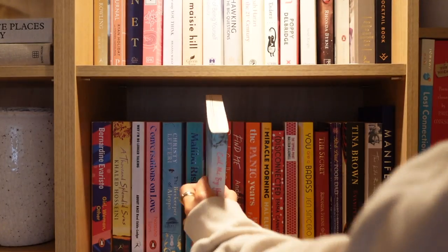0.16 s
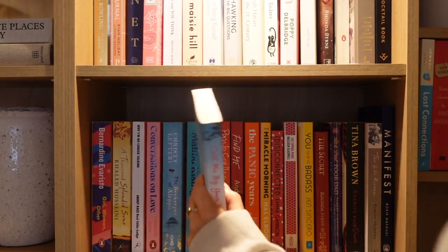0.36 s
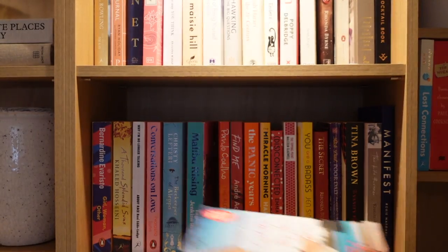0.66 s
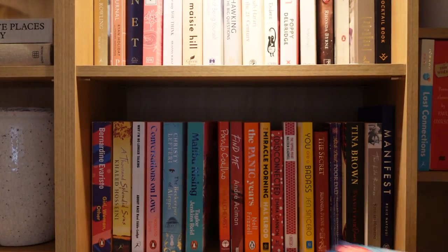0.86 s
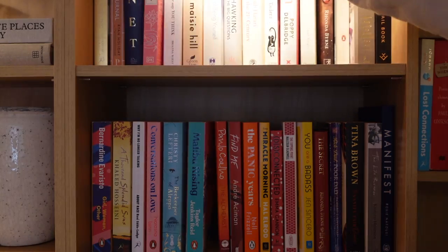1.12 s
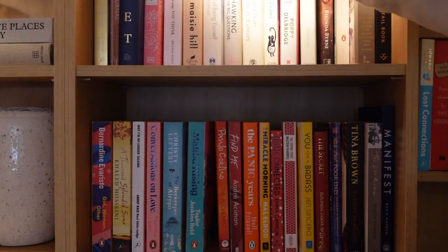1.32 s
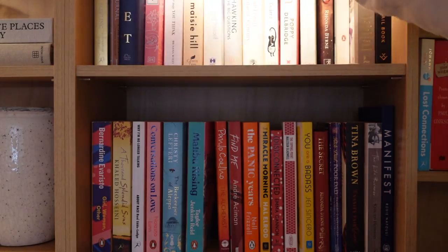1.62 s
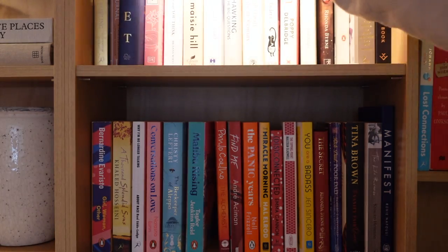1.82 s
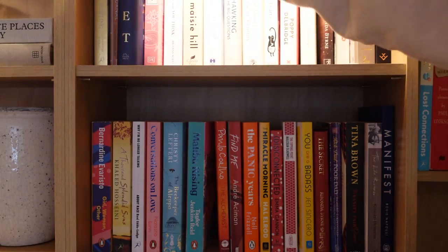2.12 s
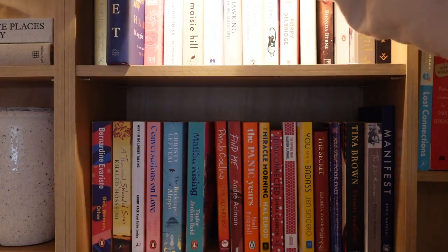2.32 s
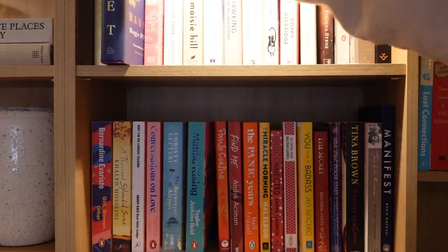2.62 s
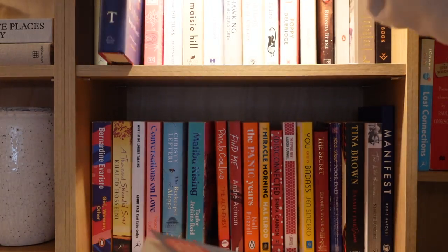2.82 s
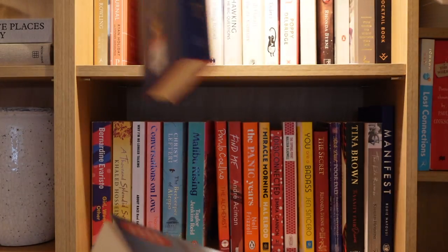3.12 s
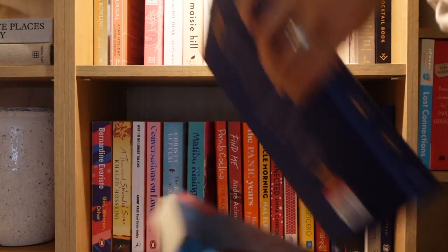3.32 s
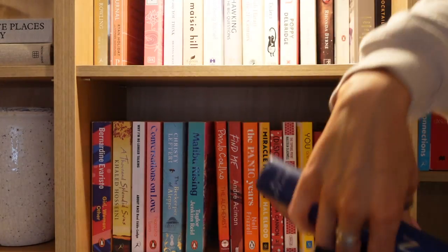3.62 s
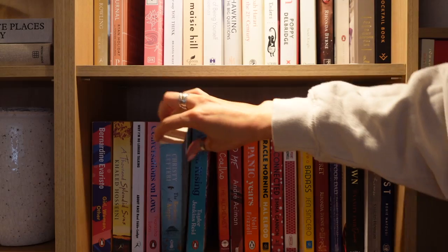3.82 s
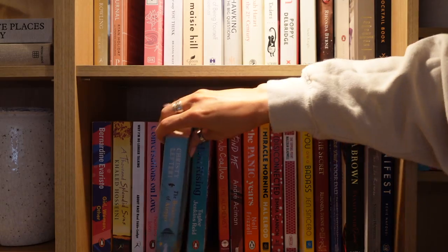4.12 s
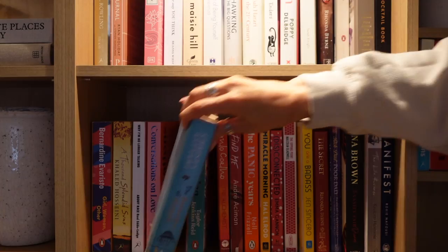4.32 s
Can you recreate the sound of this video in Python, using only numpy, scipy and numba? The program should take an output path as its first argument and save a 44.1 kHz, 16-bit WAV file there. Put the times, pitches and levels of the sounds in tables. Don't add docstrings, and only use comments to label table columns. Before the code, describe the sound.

Paperbacks slide from a tightly packed wooden shelf with airy cover rubs, a sharp crack, hollow wooden knocks and tiny squeaks in a quiet room.

```python
import sys
import numpy as np
from scipy import signal
from scipy.fft import rfft, irfft
from scipy.io import wavfile
from scipy.ndimage import uniform_filter1d
from numba import njit

SR = 44100
rng = np.random.default_rng(int(sys.argv[2]) if len(sys.argv) > 2 else 0)


def level_to_linear(level):
    exponent = np.asarray(level, float) / 20
    return 10 ** exponent


def file_out(sig):
    cols = np.atleast_2d(sig).T
    lim = np.clip(cols, -1, 1)
    pcm = np.round(lim * 32767).astype(np.int16)
    wavfile.write(sys.argv[1], SR, pcm)


N = 196412
TIME_S = np.arange(N) / SR


def level(x, db=0):
    return x * level_to_linear(db) / np.sqrt(np.mean(x ** 2))


@njit
def moving_bandpass(x, hz, q):
    y, band_state, low_state = np.empty(len(x)), 0., 0.
    for i in range(len(x)):
        g = np.tan(np.pi * hz[i] / SR)
        v = (band_state + g * (x[i] - low_state)) / (1 + g * (g + 1 / q))
        band_state = 2 * v - band_state
        low_state += 2 * g * v
        y[i] = v / q
    return y


def band(x, hz, q):
    hz = np.clip(hz * np.ones(len(x)), 20, .4 * SR)
    once = moving_bandpass(x, hz, 1. * q)
    return moving_bandpass(once, hz, 1. * q)


def walk(rate_hz):
    hold = int(SR / rate_hz)
    steps = np.repeat(rng.standard_normal(N // hold + 1), hold)
    return 1.57 * uniform_filter1d(uniform_filter1d(steps, hold), hold)[:N]


def pan(x, db):
    return x * level_to_linear(np.array([db, -db]).reshape(2, -1) / 2)


def add(out, s, x):
    i = int(s * SR)
    out[..., i:i + x.shape[-1]] += x[..., :N - i]


def per_sample(per_ms):
    return np.interp(TIME_S * 1000, np.arange(len(per_ms)), per_ms)


CUTS_S = [
    1.058,
    3.387,
    3.79,
]


def contact_power(contacts):
    shape = 1.25
    t = np.arange(0, N / SR + .002, .001)
    s, db, rise_ms, fall_ms = np.transpose(contacts)[:4, :, None]
    away = np.abs(t - s) * 1000 / np.where(t < s, rise_ms, fall_ms)
    same_moment = np.searchsorted(CUTS_S, t) == np.searchsorted(CUTS_S, s)
    return level_to_linear(2 * (db - 20 * away ** shape)) * same_moment + 1e-14


HAND_SIDE = [
    -3.5,
    -.6,
    0,
    -4.5,
    -2,
]


def hand_pan(s):
    return np.array(HAND_SIDE)[np.searchsorted([CUTS_S[0], 2.4, *CUTS_S[1:]], s)]


HISS_SPECTRUM = [(20, -72), (60, -37), (120, -31.5), (250, -24.5), (420, -19), (600, -10), (900, -15.5),
                 (1300, -13), (2500, -15), (5000, -21.5), (9000, -24.5), (13000, -30), (15700, -29)]


def hiss():
    hz, db = np.transpose(HISS_SPECTRUM)
    bins = np.maximum(np.fft.rfftfreq(N, 1 / SR), 1)
    curve = level_to_linear(np.interp(np.log(bins), np.log(hz), db))
    return level(irfft(rfft(rng.standard_normal(N)) * curve, N))


def fan_whirr():
    hz, width_hz = 617.4, 54
    return level(band(rng.standard_normal(N), hz, hz / width_hz * 0.56), -76)


def hush():
    sign = np.array([[1], [-1]])
    side = signal.sosfilt(signal.butter(1, 400, "high", fs=SR, output="sos"), hiss())
    surge = level_to_linear(9.7 * np.exp(-((TIME_S - .78) / 0.082) ** 2))
    air = level_to_linear(-69.5) * (hiss() + 1.2 * sign * side)
    return air + surge * (fan_whirr() + 0.33 * sign * fan_whirr())


def slips(scatter_db, judder_db, judder_hz):
    sizes = level_to_linear(scatter_db * rng.exponential(size=N) + judder_db * walk(judder_hz))
    return rng.standard_normal(N) * np.minimum(sizes, 4.5)


PANEL = (4.035, 4.125, .55, 1.587)


def panel_echo(x):
    start, stop, share, ms = PANEL
    feedback = np.zeros(round(ms * SR / 1000) + 1)
    feedback[[0, -1]] = 1, -share
    facing = np.interp(TIME_S, [start - .01, start, stop - .015, stop + .015], [0, 1, 1, 0])
    combed = np.sqrt(1 - share ** 2) * signal.lfilter([1], feedback, x)
    return (1 - facing) * x + facing * combed


# peak t/s, level/dB, rise/ms over 20 dB, fall/ms over 20 dB, centre f/Hz
COVER_SLIDES = [(.045, -56.5, 62, 250, 3580), (.11, -56, 96, 262, 4900), (.17, -70, 88, 202, 5200),
                (.976, -66, 198, 66, 4800), (1.055, -68.5, 108, 50, 4400), (1.133, -43, 3, 54, 5600),
                (1.185, -44.5, 126, 139, 5740), (1.225, -37, 140, 75, 6000), (1.27, -46, 104, 60, 5600),
                (2.18, -59, 72, 292, 5350), (2.27, -45.5, 156, 138, 5500), (2.74, -41, 111, 105, 5000),
                (2.775, -40, 130, 105, 4480), (2.81, -40.5, 112, 33, 4150), (4.088, -48, 45, 96, 6160),
                (4.2, -54, 120, 152, 5800)]
TIGHT_SLIDES = [(1.43, -60, 26, 248, 4300), (1.53, -64, 500, 45, 4900), (1.61, -67, 47, 400, 6350),
                (1.75, -64.5, 170, 200, 5100), (1.872, -52.5, 85, 24.5, 5300), (1.96, -63, 200, 200, 5650),
                (2.29, -50, 83, 148, 6060), (2.336, -38.5, 128, 29.5, 4570), (2.575, -63, 29, 198, 5950),
                (2.61, -46.5, 39, 300, 5560), (2.655, -53, 103, 197, 6800), (3.555, -63.5, 39, 298, 4400),
                (3.634, -55, 64, 197, 4500), (3.68, -66, 80, 150, 4500), (4.052, -51.5, 16, 150, 7200),
                (4.1, -50.5, 20, 79, 5030)]
BRUSHES = [(.255, -57, 210, 138, 6700), (.55, -67, 460, 410, 5830), (.63, -61, 59, 140, 6170),
           (1.07, -59, 15, 100, 4800), (1.105, -70, 100, 52, 6000), (1.83, -57.5, 72, 95, 5740),
           (1.9, -58.5, 37, 190, 5670), (2.05, -59.5, 220, 39, 5200), (2.488, -55, 67, 33, 5000),
           (2.7, -72, 51, 140, 5200), (3.27, -71.5, 80, 60, 6500), (3.795, -67.5, 20, 28, 4840),
           (3.83, -72, 17, 48, 5500), (3.893, -69, 130, 20, 4740), (4.017, -69, 28, 10, 5600),
           (4.06, -69, 19, 150, 7500), (4.15, -65.5, 80, 85, 4800), (4.274, -52.5, 65, 80, 5700)]
BLOCK_SHIFTS = [(.04, -67, 190, 190, 3680), (.88, -66.5, 210, 310, 4650), (1.285, -50.5, 95, 93, 4300),
                (2.06, -59, 9, 87.5, 4900), (2.22, -53.5, 103, 196, 5360), (2.37, -60.5, 50, 164, 4600),
                (2.69, -50.5, 192, 202, 4730), (2.87, -58, 210, 324, 4800), (2.992, -61.5, 270, 40, 4150),
                (3.02, -85, 56, 197, 4060), (3.39, -54.5, 6.1, 185, 4520), (3.499, -57.5, 50, 50.6, 3440),
                (3.66, -57, 110, 148, 4360), (3.785, -57.5, 100, 50, 4300), (4.128, -56.5, 50, 99, 4860),
                (4.4, -70, 300, 300, 4840)]


def rubbing():
    kinds = [(COVER_SLIDES, (-14, -16, 0.09)), (TIGHT_SLIDES, (-46, -13.5, 0.37)),
             (BRUSHES, (0.23, -19, 0.25)), (BLOCK_SHIFTS, (-26, 3.2, 0.18))]
    contacts = np.concatenate([rows for rows, _ in kinds])
    sheen_db, block_db, focus = np.transpose([tone for rows, tone in kinds for _ in rows])
    power = contact_power(contacts)
    total_power = power.sum(axis=0)
    hz = per_sample(contacts[:, 4] @ power / total_power)
    focus = per_sample(focus @ power / total_power)
    rub_gain = per_sample(np.sqrt(total_power))
    sheen_gain = per_sample(np.sqrt(level_to_linear(2 * sheen_db) @ power))
    block_gain = per_sample(np.sqrt(level_to_linear(2 * block_db) @ power))
    grip = level_to_linear(0.38 * walk(40))
    grit = slips(0.79, 0.89, 150)
    hz = hz * (1 + 0.07 * walk(30))
    broad = level(band(grit, hz, q=.6))
    narrow = level(band(band(grit, hz, q=1.0), hz, q=1.0))
    focus = np.clip(1.25 * focus - .1, 0, 1)
    cover = (1 - focus) * broad + focus * narrow
    sheen = level(band(slips(1.2, 2.2, 200), 9600, q=.7))
    block = level(band(slips(1.4, 1.6, 80), 2000, q=1.05))
    body = panel_echo(rub_gain * cover + level_to_linear(-6.0) * block_gain * block)
    rustle = panel_echo(level_to_linear(-6.0) * sheen_gain * sheen)
    pan_db = hand_pan(TIME_S)
    return grip * (pan(body, pan_db) + pan(rustle, pan_db + 5.0))


SCUFFS = [(0.8667, -59, 2370, 4.7, 0.94), (1.0626, -48.5, 3600, 12, 1.5), (1.1279, -27, 5300, 7.9, 0.72),
          (1.413, -46.5, 4500, 3.6, 1.5), (1.421, -43.5, 4250, 4.7, 1.5), (1.869, -37, 5370, 3.8, 3.6),
          (1.8695, -44.5, 2770, 5.1, 1.8), (2.0552, -37, 4900, 7.2, 0.88), (2.476, -64.5, 4800, 6.3, 0.99),
          (2.4842, -44.5, 4860, 2.6, 3.6), (3.388, -38, 2150, 15, 0.37), (3.6157, -62, 1480, 2.4, 0.49),
          (3.6331, -34.5, 4400, 4.7, 0.55), (3.8688, -55, 1660, 2.8, 0.54), (4, -50, 2470, 4.7, 0.72),
          (4.0163, -47.5, 6400, 3.7, 0.88)]


def scuffs():
    out, t = np.zeros((2, N)), np.arange(2000) / SR
    for s, db, hz, ms, q in SCUFFS:
        grit = rng.standard_normal(len(t)) * np.exp(-(t * 1000 / ms) ** 3)
        click = 3.5 * (t == t[30])
        burst = band(grit + click, hz, q)
        add(out, s, pan(burst / np.abs(burst).max() * level_to_linear(db), hand_pan(s)))
    return out


# t/s, peak level/dB, ring f/Hz, rumble level/dB, rumble t60/s
HOLLOW_KNOCKS = [
    (.971, -59, 480, -13, 0.29),
    (1.283, -57.5, 263, 4.5, 0.17),
    (1.29, -51, 840, -5, 0.44),
    (1.335, -57, 890, -3, 0.13),
    (2.056, -47, 1335, -15.5, 0.053),
    (2.985, -60, 580, 2, 0.46),
    (2.988, -73, 286, -14, 0.089),
    (3.432, -46.5, 446, -12.5, 0.31),
    (3.4, -60, 476, 2, 0.24),
]
DULL_KNOCKS = [
    (1.288, -39, 790, -13.5, 0.38),
    (2.791, -72, 220, 2.5, 0.3),
    (3.392, -57, 405, -0.5, 0.54),
    (3.778, -55.5, 445, 2.5, 0.02),
    (4.265, -50, 1530, -9, 0.034),
]
DRY_CRACKS = [
    (1.2885, -36, 1550, -1, 0.034),
    (3.6148, -39, 1600, -12, 0.072),
    (3.7785, -40, 1430, -8.5, 0.052),
]


def knocks():
    out, t = np.zeros(N), np.arange(16000) / SR
    for blows, q in [(HOLLOW_KNOCKS, 4.8), (DULL_KNOCKS, 1.55), (DRY_CRACKS, 0.75)]:
        for s, db, hz, rumble_db, t60 in blows:
            blow = band(1. * (t == 0), hz, q)
            rumble = level(band(rng.standard_normal(len(t)), hz, q), rumble_db - 1.5)
            rumble *= level_to_linear(-60 * t / t60) * np.minimum(t / 0.0025, 1)
            add(out, s, (blow / np.abs(blow).max() + rumble) * level_to_linear(db))
    return out


BUMPS = [
    (1.058, -73, 60.4, 0.042),
    (1.292, -73, 145, 0.35),
    (1.295, -76, 105, 0.35),
    (2.056, -78, 127.6, .08),
    (2.491, -65, 190, 0.032),
    (2.799, -84, 157, 0.1),
    (3.39, -74, 142, 0.12),
    (3.774, -92, 159, 0.078),
    (4.01, -73, 118, 0.063),
    (4.264, -70, 153, 0.054),
]


def bumps():
    out, t = np.zeros(N), np.arange(16000) / SR
    for s, db, hz, t60 in BUMPS:
        envelope = level_to_linear(-60 * t / t60) * (1 - np.exp(-t * hz / 0.41))
        add(out, s, level_to_linear(db) * np.sin(2 * np.pi * hz * t) * envelope)
    return out


BOARD_MODES = [
    (190, 60, -26),
    (300, 80, -8),
    (430, 60, -11),
    (585, 40, -1),
    (820, 55, 0.5),
    (1020, 120, -9),
    (1260, 75, -0.5),
    (1670, 70, -9),
]
DRAGS = [
    (2.19, -71, 79, 300, 0.5),
    (2.265, -54.5, 40, 185, 9),
    (2.345, -54, 230, 70, 7.5),
    (2.672, -55, 90, 390, 10.5),
    (2.8, -59, 630, 300, 0),
    (2.871, -49, 60, 23, 6),
    (2.926, -48.5, 110, 150, 4),
    (2.994, -47.5, 130, 13, -0.5),
    (3.03, -66.5, 50, 240, 2),
]


def shelf_hum():
    power = contact_power(DRAGS)
    total_power = power.sum(axis=0)
    tilt_db = per_sample(np.transpose(DRAGS)[4] @ power / total_power)
    hum = np.zeros(N)
    for hz, width_hz, db in BOARD_MODES:
        mode = level(band(rng.standard_normal(N), hz, q=.64 * hz / width_hz))
        hum += mode * level_to_linear(db + 2.5 * walk(30) + tilt_db * np.log2(hz / 700))
    return level(hum, -5.0) * per_sample(np.sqrt(total_power))


SQUEAKS = [
    (2.95, 29, 2480, -53.5),
    (4.114, 11.5, 2390, -45),
    (4.124, 18, 1182, -55),
    (4.144, 10, 3130, -43.5),
    (4.198, 15, 2930, -49.5),
]


def squeaks():
    out = np.zeros(N)
    for s, ms, hz, db in SQUEAKS:
        phase = 2 * np.pi * hz * np.arange(int(ms * SR / 1000)) / SR
        tone = np.sin(phase) + .35 * np.sin(2 * phase) + .25 * np.sin(3 * phase) + .2 * np.sin(4 * phase)
        add(out, s, level_to_linear(db) * tone * np.hanning(len(phase)))
    return out


def room(x):
    t60_s, send_db = 0.26, -10
    t = np.arange(int(.5 * SR)) / SR
    tails = rng.standard_normal((2, len(t))) * level_to_linear(-60 * t / t60_s) * np.minimum(t / 0.0017, 1)
    tails *= level_to_linear(send_db) / np.sqrt(np.sum(tails ** 2, axis=1, keepdims=True))
    cuts = (np.array(CUTS_S) * SR).astype(int)
    moments = np.split(x.mean(axis=0, keepdims=True), cuts, axis=1)
    return np.hstack([signal.fftconvolve(m, tails, axes=1)[:, :m.shape[1]] for m in moments])


def scene():
    near = rubbing() + scuffs() + knocks() + bumps() + shelf_hum() + squeaks()
    return hush() + near + room(near)


def roll_off(x):
    return signal.sosfilt(signal.butter(12, 15790, fs=SR, output="sos"), x)


def record(dry):
    mix = signal.sosfilt(signal.ellip(10, .2, 70, 15750, fs=SR, output="sos"), dry)
    return roll_off(mix)


dry = scene()
out = record(dry)
file_out(out)
```